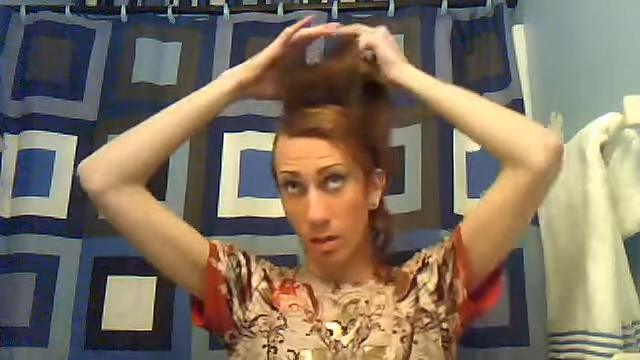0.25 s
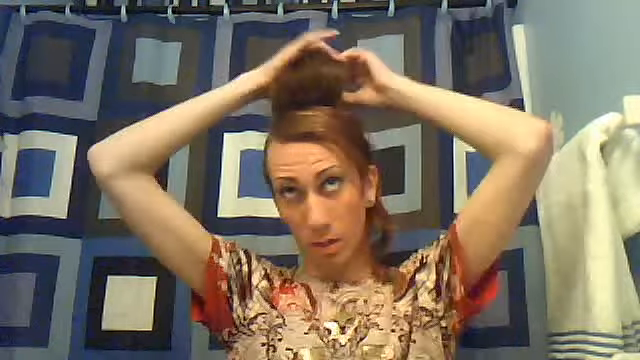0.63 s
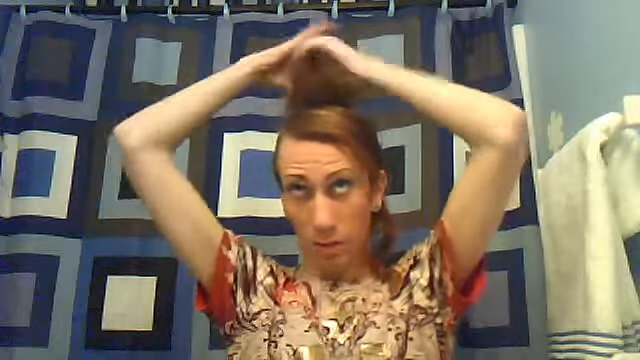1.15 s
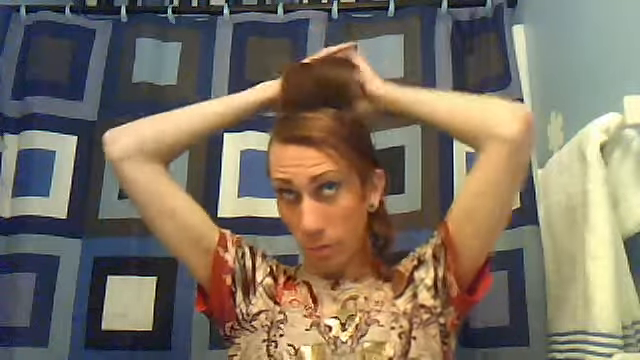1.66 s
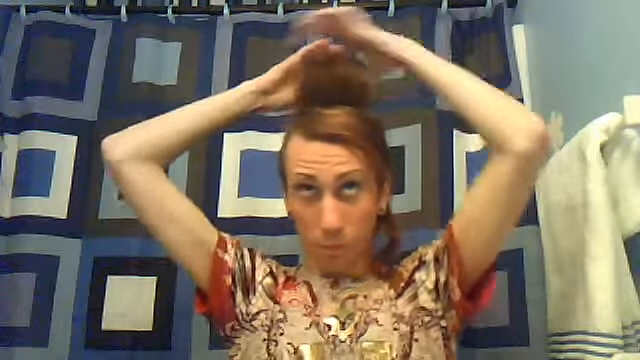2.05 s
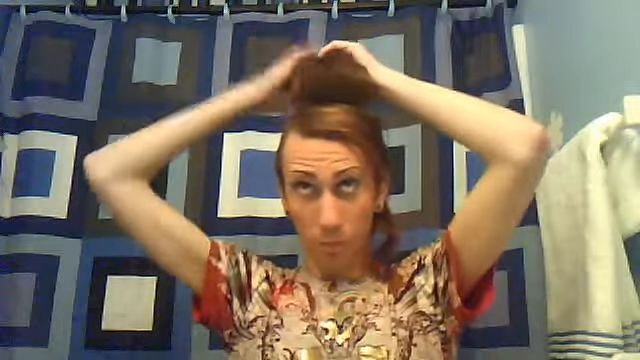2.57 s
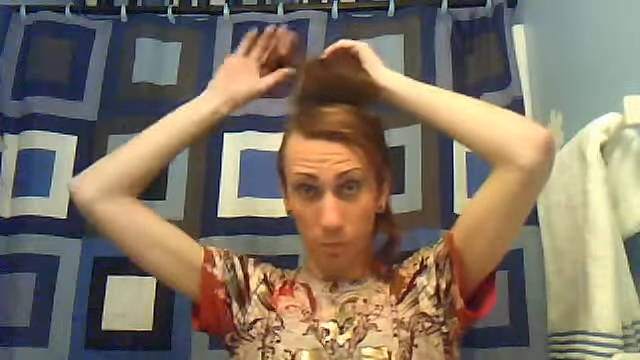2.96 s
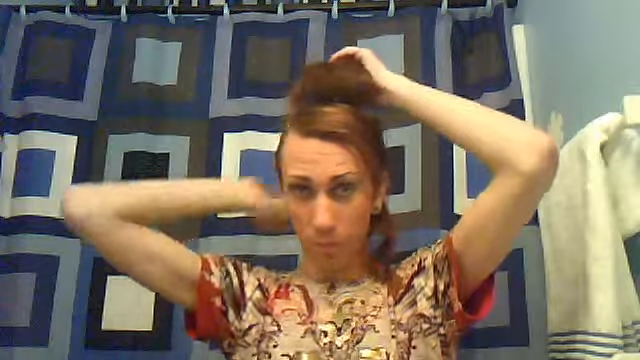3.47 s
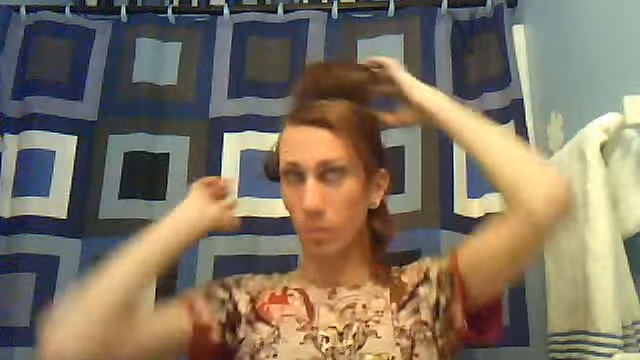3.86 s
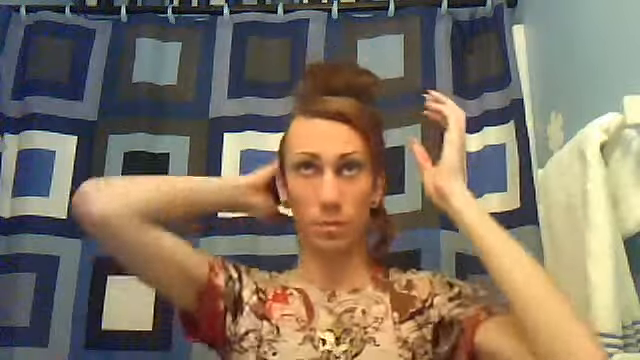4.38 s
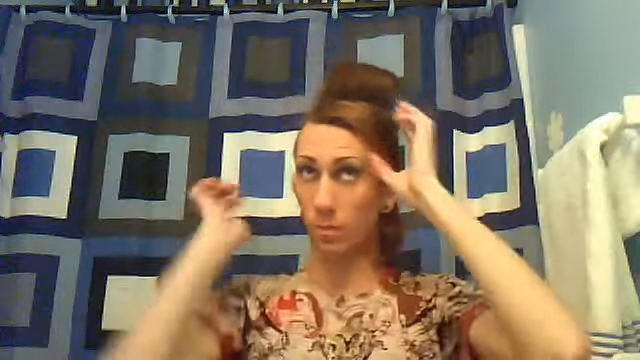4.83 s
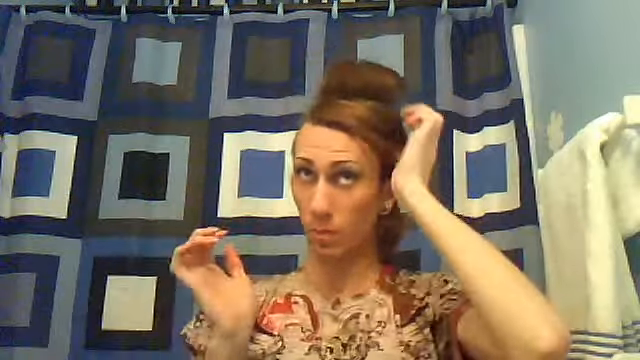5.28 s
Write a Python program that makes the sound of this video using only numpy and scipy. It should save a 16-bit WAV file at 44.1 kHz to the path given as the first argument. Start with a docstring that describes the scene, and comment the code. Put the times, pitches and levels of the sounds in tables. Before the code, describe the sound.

Paired electrical ticks crackle and soften into thumps over a loud mains hum, fan whir and a faint, high, stuttering whine.

```python
"""A computer's microphone input in a small room. From the start a loud mains hum lies under
everything, with a whirring fan and faint hiss. A thin high whine begins switching on and off.
Then electrical interference ticks in pairs, as bursts of computer work disturb the power supply.
The ticks crackle for about two seconds, turn into soft thumps while the computer idles,
crackle again briefly after four seconds, and end as soft thumps."""
import sys
import numpy as np
from scipy.fft import rfft, irfft, next_fast_len
from scipy.io import wavfile
from scipy.ndimage import uniform_filter1d, map_coordinates

SR = 44100
rng = np.random.default_rng(int(sys.argv[2]) if len(sys.argv) > 2 else 0)


def transcribe(u):
    """Save the signal u as a 16-bit wav file named by the first command-line argument.

    u: samples, shape (n,) or (channels, n), limited to [-1, 1]; the rate is SR.
    q: integer samples, one column per channel.
    """
    v = np.clip(np.atleast_2d(u).T, -1, 1)
    q = np.round(v * 32767).astype(np.int16)
    wavfile.write(sys.argv[1], SR, q)


N = 242550  # 5.5 seconds


def amp(db):
    """Turn decibels into a number to multiply by."""
    return 10 ** (np.asarray(db) / 20)


def wobble(knots_per_s):
    """A smooth curve through random points."""
    knots = rng.standard_normal(int(N * knots_per_s / SR) + 4)
    return map_coordinates(knots, [np.arange(N) * knots_per_s / SR])


def filtered(x, response):
    """Multiply each frequency in x by response(hz)."""
    size = next_fast_len(N + SR // 2)
    hz = np.fft.rfftfreq(size, 1 / SR)
    return irfft(rfft(x, size) * response(hz), size)[:N]


def noise(spectrum):
    """Noise of average (rms) level 1, shaped by rows of frequency_hz, relative_db."""
    points_hz, db = np.transpose(spectrum)
    white = rng.standard_normal(N)
    shaped = filtered(white, lambda hz: amp(np.interp(np.log(hz + 1), np.log(points_hz), db)))
    return shaped / np.sqrt(np.mean(shaped ** 2) + 1e-20)


def tone(hz, drift_rad=0):
    """A pure tone of average (rms) level 1, pushed ahead or behind by the drift."""
    return np.sqrt(2) * np.sin(2 * np.pi * (hz * np.arange(N) / SR + rng.random()) + drift_rad)


def add(track, start_s, sound):
    """Mix a sound into the track."""
    part = track[round(start_s * SR):][:len(sound)]
    part += sound[:len(part)]


# The tones that make up the hum: multiple_of_mains_pitch, level_db
HUM_TONES = [(1, -24), (2, -34.5), (3, -53.5), (4, -63), (5, -61), (6, -49.5), (7, -60.5), (8, -66),
             (9, -65), (10, -64), (12, -66.5), (13, -63.5), (16, -84), (18, -73)]


def hum(mains_hz=60.014):
    """Mains power leaks in as steady tones that all peak together once a cycle."""
    angle = 2 * np.pi * (mains_hz * np.arange(N) / SR + rng.random())
    return np.sqrt(2) * sum(amp(db) * np.cos(round(multiple) * angle) for multiple, db in HUM_TONES)


# The tones of the fan and other spinning parts: pitch_hz, level_db
SPIN_TONES = [(89.98, -50.5), (324.85, -57), (520, -68), (844.6, -55), (1039.5, -80.5), (1440.8, -75.5),
              (1689.2, -73.5), (2534, -80.5)]
# The fan's rushing air, from low to high: frequency_hz, relative_db
AIR_SPECTRUM = [(10, -0.5), (35, 1.5), (75, -5.5), (110, -2.5), (230, -17), (330, -18.5), (450, -21),
                (850, -17), (1100, -25.5), (1500, -23), (2100, -29), (2700, -35.5), (5000, -52),
                (9000, -73.5)]


def fan(air_db=-48, unsteadiness=0.0006):
    """Spinning parts make slightly wandering tones over rushing air."""
    drift = unsteadiness * wobble(3)
    tones = sum(amp(db) * tone(hz, hz * drift) for hz, db in SPIN_TONES)
    return tones + amp(air_db) * noise(AIR_SPECTRUM)


# The hiss, from low to high: frequency_hz, relative_db
HISS_SPECTRUM = [(100, -1), (4000, 3.5), (6000, -0.5), (7600, 4), (10600, -2.5)]


def hiss(level_db=-65.0, flicker_db=1):
    """The input's own electronics hiss, with a faint flicker."""
    return amp(level_db + flicker_db * wobble(90)) * noise(HISS_SPECTRUM)


def whine(pitch_hz=8000, level_db=-61.0, start_s=0.0425, switch_hz=14.32, on_share=0.45):
    """A high electronic tone leaks in, switching on and off many times a second."""
    cycle = (np.arange(N) / SR - start_s) * switch_hz % 1
    gate = uniform_filter1d(1. * (cycle < on_share), size=24)  # softens each switch
    return amp(level_db) * gate * tone(pitch_hz)


# When the computer is busy and its ticks crackle: start_s, end_s
BUSY_TIMES = [(0, 2.18), (4.13, 4.85)]
# One burst of work, when busy and when idle: thump_db, crackle_db, supply_drain_s
BUSY_TICK = (-30, -33.5, 0.0047)
IDLE_TICK = (-33.5, -51.5, 0.0024)
# Bursts that stall and slip off the beat: start_s, pause_clock_cycles, extra_crackle_db
STALLED_TICKS = [(1.1736, 0.046, 0), (1.3477, 0.88, 2), (2.1164, 0.29, 0.5), (4.1943, 1.1, -2),
                 (4.431, 1.6, 0.5), (4.5492, 1.95, 2.5), (4.7852, .65, 1.5)]


def ticks(first_s=0.0993, beat_s=0.17802, pair_gap_s=0.0588, jitter_s=0.0005):
    """The computer works in two bursts a beat; each makes a tick, part thump and part crackle."""
    beats = np.arange(first_s, N / SR, beat_s)
    times = (beats[:, None] + [0, pair_gap_s]).ravel()
    scatter = rng.standard_normal((len(times), 3))
    track = np.zeros(N)
    for number, (due_s, (late, heavy, sharp)) in enumerate(zip(times, scatter)):
        busy = any(start < due_s < end for start, end in BUSY_TIMES)
        thump_db, crackle_db, drain_s = BUSY_TICK if busy else IDLE_TICK
        if number % 2:  # the second of a pair is lighter and sharper
            thump_db -= 1
            crackle_db += 0.5
        start_s = due_s + jitter_s * late
        pause_cycles = 0
        for stall_s, cycles, extra_db in STALLED_TICKS:
            if abs(stall_s - start_s) < pair_gap_s / 2:
                start_s, pause_cycles = stall_s, cycles
                thump_db -= 3  # a stalled burst draws less power
                crackle_db += extra_db
        add(track, start_s, amp(thump_db + 1.4 * heavy) * thump(drain_s))
        add(track, start_s, amp(crackle_db + 0.5 * sharp) * crackle(pause_cycles))
    return track


def thump(drain_s, rise_s=0.00067):
    """A bump in the supply voltage: it charges quickly and drains slowly."""
    t = np.arange(SR // 20) / SR
    return np.minimum(t / rise_s, 1) * np.exp(-np.maximum(t - rise_s, 0) / drain_s)


def crackle(pause_cycles, clock_hz=3280, on_share=0.77, scatter_db=0.18):
    """Digital switching leaks three square pulses, or two pairs around a long pause."""
    count = 4 if pause_cycles > 1.25 else 3  # a long pause snaps lower and fuller
    t = np.arange(SR // 200) / SR
    index = np.arange(count)[:, None]
    half_width_s = on_share / clock_hz / 2
    centres_s = half_width_s + (index + pause_cycles * (index >= count // 2)) / clock_hz
    pulses = np.clip((half_width_s - np.abs(t - centres_s)) * SR + .5, 0, 1)
    heights = amp(-scatter_db * rng.standard_normal((count, 1)))
    return np.sum(heights * pulses, axis=0)


def interference(bass_cut_hz=55, edge_hz=7800):
    """The ticks enter the input through a capacitor, which blocks their deepest bass."""
    thinned = filtered(ticks(), lambda hz: 1j * hz / (bass_cut_hz + 1j * hz))
    # the input rounds each sharp edge and overshoots a little
    return filtered(thinned, lambda hz: 1 / (1 - (hz / edge_hz) ** 2 + 1j * hz / edge_hz))


def scene():
    """Everything meets on one microphone line."""
    return (hum() + fan() + hiss() + whine() + interference())[None]


# How much the highest sounds are turned down: frequency_hz, gain_db
TREBLE_CUT = [(9200, 0), (9600, -6.5), (10600, -4)]


def record(dry, top_hz=10620):
    """The recorder dulls the highest sounds and cuts off steeply above top_hz."""
    points_hz, gain_db = np.transpose(TREBLE_CUT)
    dulled = filtered(dry[0], lambda hz: amp(np.interp(hz, points_hz, gain_db)))
    return filtered(dulled, lambda hz: 1 / np.sqrt(1 + (hz / top_hz) ** 300))[None]


dry = scene()
out = record(dry)
transcribe(out)
```